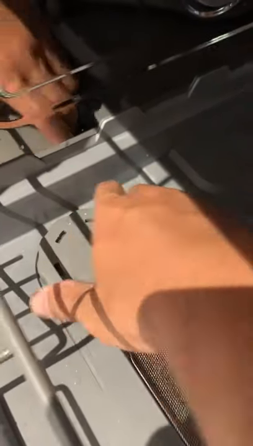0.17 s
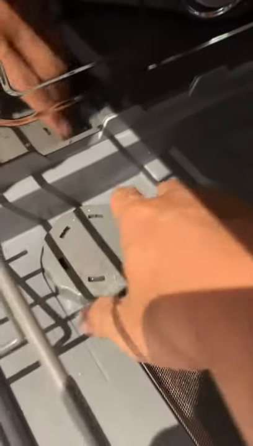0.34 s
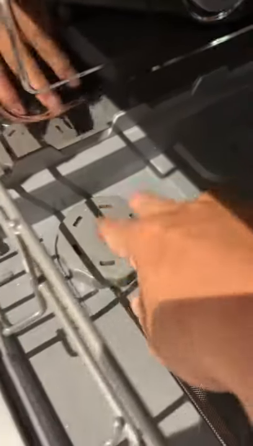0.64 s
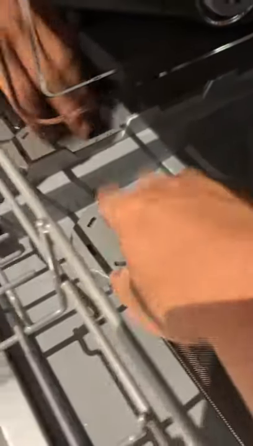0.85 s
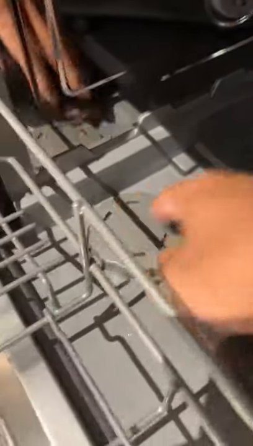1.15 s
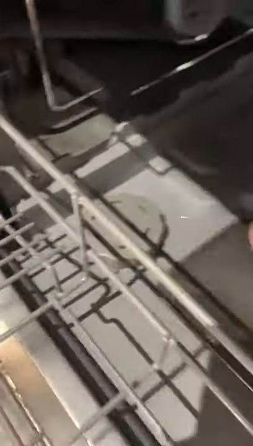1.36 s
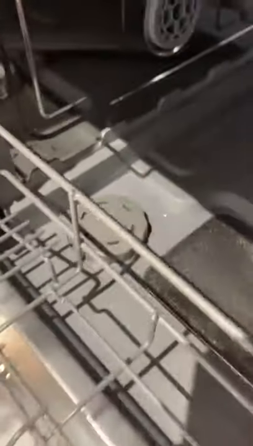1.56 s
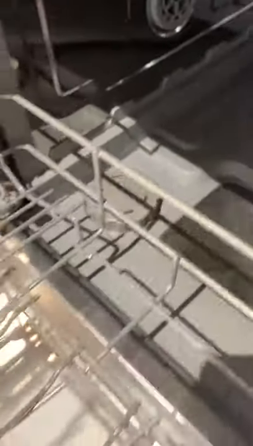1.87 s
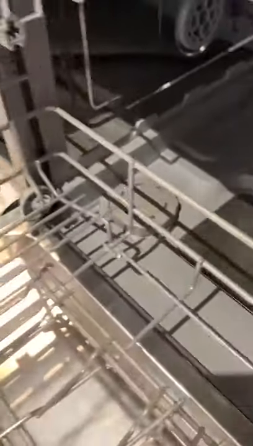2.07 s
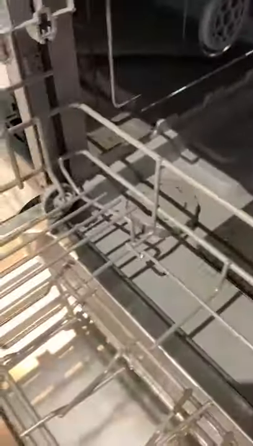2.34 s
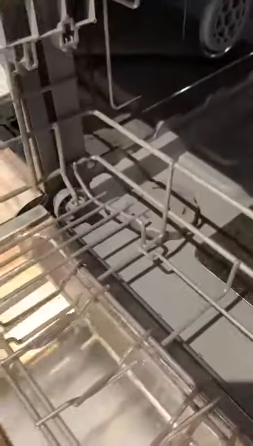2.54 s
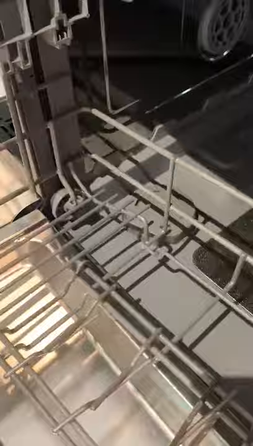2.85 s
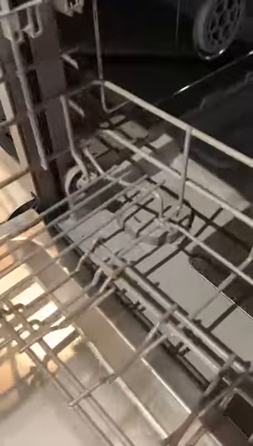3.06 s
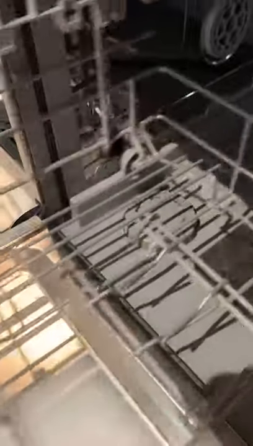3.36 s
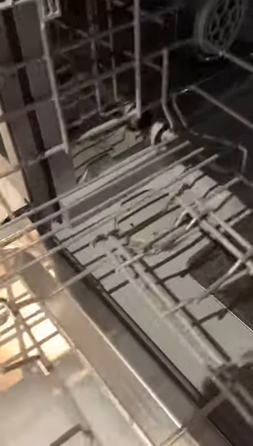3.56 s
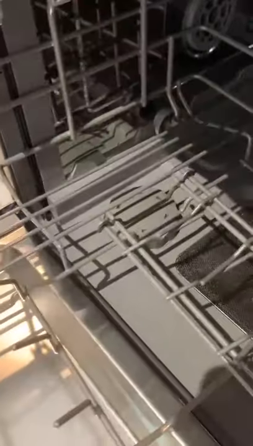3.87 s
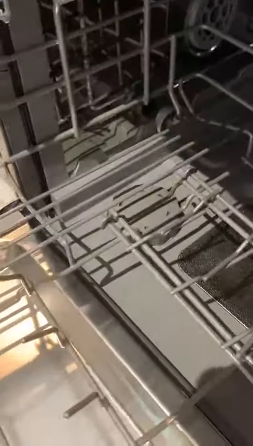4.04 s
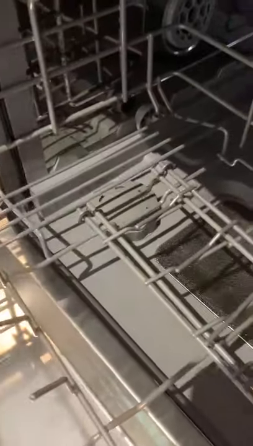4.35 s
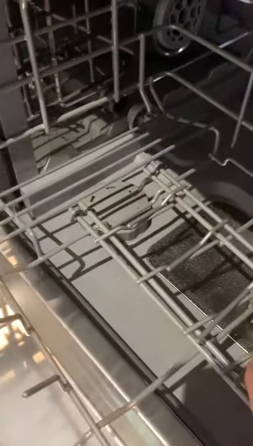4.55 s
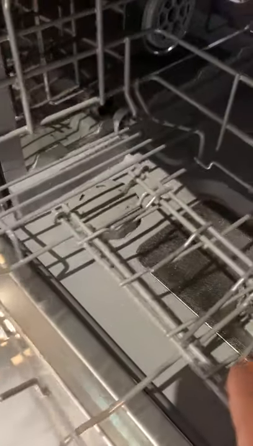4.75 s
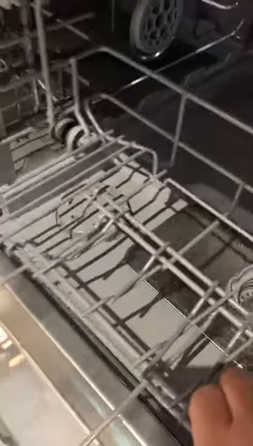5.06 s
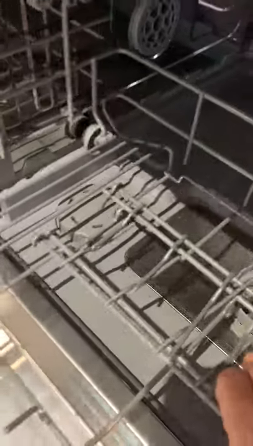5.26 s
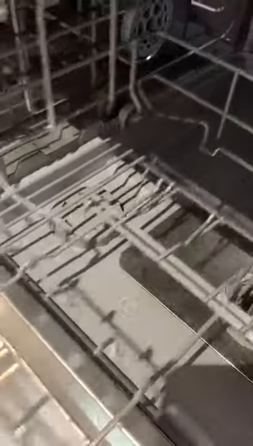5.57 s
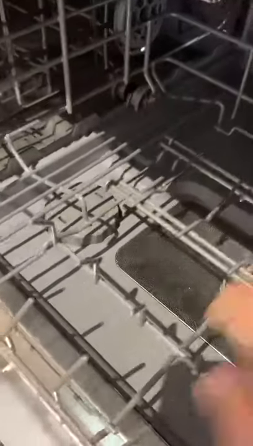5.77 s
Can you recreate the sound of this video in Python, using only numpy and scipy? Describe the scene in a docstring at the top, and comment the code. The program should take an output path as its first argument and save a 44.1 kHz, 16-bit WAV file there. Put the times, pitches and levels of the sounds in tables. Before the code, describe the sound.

Close, dry stereo in an open dishwasher in a quiet kitchen. A low motor hum runs throughout. Just before one second a plastic part snaps into the tub floor with a hard knock and a hollow boom. Then a coated wire rack is rolled in short shoves, clacking and rattling, with a dense clatter around three and a half seconds and a harder one near five.

```python
"""Rack and tub of a dishwasher

Close to an open dishwasher, a plastic part snaps into the tub floor: filtered noise bursts and a boom.
Then a coated wire rack is rolled and jostled: chattering pulses excite noise, with modes of wires and frame.
Landings make the hollow door and tub boom; random bumps and snags give the wheels' rumble and scrape.
Harmonics of a motor hum somewhere in the kitchen, over soft noise of the air."""
import sys
import numpy as np
from scipy import signal
from scipy.fft import rfft, irfft
from scipy.io import wavfile

SR = 44100
rng = np.random.default_rng(int(sys.argv[2]) if len(sys.argv) > 2 else 0)


def int16_out(signal):
    """Quantize to a 16-bit WAV file."""
    q = np.round(np.clip(np.atleast_2d(signal).T, -1, 1) * 32767)
    wavfile.write(sys.argv[1], SR, q.astype(np.int16))


N = 260631
NOW = np.arange(N) / SR
AGE = np.arange(SR // 2) / SR  # seconds since a blow
WIDE_HZ = 660  # above this the two channels differ fully
TUB_T60_S, TUB_DB = .28, -19  # the steel tub holds the sound briefly


def undb(db):
    """Logarithmic level: decibels to amplitude gain."""
    return 10 ** (np.asarray(db) / 20)


def fade(t60):
    """Exponential decay: a free vibration falls 60 dB in t60 seconds."""
    return np.exp(-np.log(1000) * AGE / t60)


def push(centre_hz):
    """Contact stiffness: a dull contact builds up more slowly than a bright one."""
    return 1 - np.exp(-2 * AGE * centre_hz)


def level(x, db, size=None):
    """Power scaling: set a blend of mid and channel power over the first size samples."""
    mid_power = np.mean(x.mean(0)[:size] ** 2)
    channel_power = np.mean(x[:, :size] ** 2)
    return x * undb(db) / np.sqrt(mid_power / 2 + channel_power / 4)


def add(out, s, sound):
    """Superposition: mix a sound into out from time s."""
    start = int(s * SR)
    out[:, start:start + sound.shape[1]] += sound[:, :N - start]


def walk(per_s):
    """Random modulation: a slow wander through per_s random points a second."""
    steps = rng.standard_normal(400)
    return np.interp(NOW * per_s, np.arange(len(steps)), steps)


def focus(hz, centre_hz, slope_db):
    """Contact filtering: gain falls by slope_db an octave on both sides of the favoured range."""
    return undb(-slope_db * np.abs(np.log2(hz / centre_hz)))


def apart(hz):
    """Spatial coherence: long waves reach both channels alike, short ones do not."""
    return np.minimum(hz / WIDE_HZ, 1) ** 1.25


def noise(size, colour, centre_hz=1000, slope_db=0, ripple_db=4.5, spacing_hz=90):
    """Resonance-coloured noise: stereo, rms 1, rippled by the many resonances of the tub."""
    hz = np.maximum(np.fft.rfftfreq(size, 1 / SR), 1)
    short_wave = apart(hz)
    points, db = np.transpose(colour)
    colour_db = np.interp(np.log(hz), np.log(points), db)
    ripple = np.interp(hz / spacing_hz, np.arange(400), rng.standard_normal(400))
    gain = undb(colour_db + ripple_db * ripple * short_wave) * focus(hz, centre_hz, slope_db)
    mid, side = rfft(rng.standard_normal((2, size)))
    x = irfft(gain * np.array([mid + short_wave * side, mid - short_wave * side]), size)
    return x / x.std()


def ring(modes, centre_hz, slope_db, scatter_db, detune):
    """Modal synthesis: decaying sines whose mix and channel lag vary with where the blow lands."""
    out = 0
    draws = rng.standard_normal((len(modes), 3))
    for (hz, db, t60), (size, shift, lag) in zip(modes, draws):
        turn = 2 * np.pi * hz * (1 + detune * shift) * AGE
        phase = turn + lag * apart(hz) * np.array([[1], [-1]])
        gain = undb(db + scatter_db * size) * focus(hz, centre_hz, slope_db)
        out = out + gain * fade(t60) * np.sin(phase)
    return out / np.sqrt(np.mean(out[:, :SR // 100] ** 2))


def excite(pulses, body):
    """Convolution: every pulse sets off the body's response."""
    return signal.fftconvolve(pulses[None], body, axes=1)[:, :len(pulses)]


MOTOR_HZ = 56.87  # mean shaft rate
KITCHEN_DB = -48  # air noise
# Harmonics of the motor. Each row: multiple of the shaft rate, rms level in dB before the drift in level.
MOTOR_HARMONICS = [(1, -45), (2, -53.5), (3, -48.5)]
# Level of the hum as the listening point moves. Each row: time in seconds, gain in dB.
HUM_DRIFT = [(.7, 3.5), (1.7, 0)]
# Colour of the air noise. Each row: frequency in Hz, relative density in dB per Hz.
AIR_COLOUR = [(30, -12), (65, 11), (140, 12), (220, -3.5), (2000, -11), (3200, -19), (5200, -23),
              (8200, -14.5), (9200, -19.5), (14000, -32)]


def kitchen(waver=0.12):
    """Harmonic series: a motor of slightly unsteady speed hums over soft air noise."""
    drift_s, drift_db = np.transpose(HUM_DRIFT)
    hum_gain = undb(np.interp(NOW, drift_s, drift_db))
    shaft = 2 * np.pi * MOTOR_HZ * NOW + waver * walk(2.31)
    hum = 0
    for multiple, db in MOTOR_HARMONICS:
        start_phase = 2 * np.pi * rng.random()
        hum = hum + np.sqrt(2) * undb(db) * np.sin(round(multiple) * shaft + start_phase)
    air = noise(N, AIR_COLOUR, ripple_db=2.2)
    return hum * hum_gain + air * undb(KITCHEN_DB)


# Modes of the hollow door and tub floor. Each row: frequency in Hz, relative level in dB, free t60 in seconds.
DOOR_MODES = [(61.6, 0, 0.16), (85, -0.5, 0.29), (117.2, 0.5, 0.16), (134.8, 1.5, 0.21), (167.4, -4, 0.39),
              (201.4, 1, 0.13)]


def boom(db, centre_hz):
    """Panel resonance: the hollow door and tub floor swell and boom."""
    swing = ring(DOOR_MODES, centre_hz, slope_db=15.0, scatter_db=2, detune=0.02) * (1 - fade(0.039))
    return level(swing, db - 1.5, size=1800)


# Modes of the rack's frame. Each row: frequency in Hz, relative level in dB, free t60 in seconds.
FRAME_MODES = [(247, 0, .24), (298, 0, .28), (322, 4, .16), (350, 3, .42), (428, -4, .2)]


def frame_ring(db):
    """Damped modes: the frame rings anew at every blow; the runners soon take up the first swing."""
    swing = ring(FRAME_MODES, 400, slope_db=6, scatter_db=2, detune=.025) * (1 - fade(.03))
    return level(swing * (fade(0.056) + 0.46), db, size=1100)


PART_S = .8555  # the plastic part snaps home
# Colour of the plastic part's crack. Each row: frequency in Hz, relative density in dB per Hz.
PLASTIC_COLOUR = [(150, -51), (330, 12.5), (600, 1.5), (780, 4.5), (1300, -11.5), (2150, 5.5), (3000, -5),
                  (5400, -8), (13000, -24.5)]
# The tub floor giving way under the part, pressed and then snapped in.
# Each row: start in seconds, boom level in dB before the 1.5 dB cut in boom(), boom centre in Hz.
FLOOR_PRESSES = [(0.73, -39, 57.6), (0.868, -22, 97), (0.92, -37, 77)]


def knock(db=-27.5, echo_db=-19, seat_s=.861, seat_db=-34, frame_db=-48):
    """Impact and resonance: a stiff part snaps in and seats; crack, echo, thud, floor boom and frame ring."""
    crack = noise(len(AGE), PLASTIC_COLOUR, ripple_db=2) * fade(.068)
    echo = noise(len(AGE), PLASTIC_COLOUR, centre_hz=550, slope_db=3) * fade(.36)
    thud = noise(len(AGE), PLASTIC_COLOUR, centre_hz=670, slope_db=9) * fade(0.073) * push(680)
    out = np.zeros((2, N))
    add(out, PART_S, level(crack + undb(echo_db) * echo, db, size=750))
    add(out, seat_s, level(thud, seat_db, size=750) + frame_ring(frame_db))
    for s, boom_db, centre_hz in FLOOR_PRESSES:
        add(out, s, boom(boom_db, centre_hz))
    return out


def chatter(chatter_ms, gap_ms=2.5, first=1.3, uneven_db=3, count=60):
    """Repeated impact: a first touch, then rebounds of uneven size and gap that weaken on the whole."""
    gaps = rng.exponential(.5, count)
    sizes = rng.standard_normal(count)
    sides = rng.choice([-1, 1], count)
    ms = np.cumsum(gap_ms * (.5 + gaps))
    pulses = np.zeros(len(AGE))
    pulses[0] = first
    at = np.minimum(ms * SR // 1000, len(AGE) - 1).astype(int)
    pulses[at] += sides * undb(uneven_db * sizes) * np.exp(-ms / chatter_ms)
    return pulses


WIRE_SHARE_DB, FRAME_SHARE_DB = -1, -10  # wire tones and frame ring against the clack
# Wires striking wires and runners. Each row: start in seconds, clack level in dB, clack centre in Hz,
# tick level in dB, chatter decay time in ms.
WIRE_CLACKS = [ (1.17, -66, 1970, -62, 2.8), (1.769, -55.5, 746, -59.5, 30), (2.385, -48, 2420, -56, 26),
               (2.488, -35.5, 1260, -52, 5.1), (2.498, -40, 1070, -45, 6.8),
               (2.507, -40.5, 1720, -43.5, 14), (2.523, -50, 1900, -40.5, 9), (2.547, -40, 1670, -54, 18),
               (2.565, -48, 710, -43, 8), (2.821, -42, 740, -55.5, 9.4), (2.924, -69, 1700, -53, 1.9),
               (3.005, -46, 660, -61, 12), (3.211, -47, 1190, -50, 27), (3.278, -45, 3100, -55.5, 6),
               (3.353, -33.5, 1340, -42.5, 4.8), (3.362, -29.5, 1860, -39.5, 11.6),
               (3.379, -39, 1650, -46.5, 26), (3.452, -34, 2020, -41.5, 5.1),
               (3.463, -33.5, 610, -41.5, 16), (3.555, -39, 2150, -45.5, 1.4),
               (3.6029, -42.5, 2960, -51, 2.5), (3.605, -29.5, 1150, -61, 1.3),
               (3.628, -41.5, 1150, -65, 10), (3.662, -48, 2900, -49, 4), (3.689, -34.5, 887, -46.5, 14),
               (3.71, -38, 1000, -56, 7.6), (3.842, -39, 670, -78, 2.7), (3.972, -52, 1040, -85, 3.3),
               (4.209, -41, 1200, -54.5, 15), (4.243, -41.5, 1080, -58, 4), (4.412, -41, 1290, -48.5, 17),
               (4.778, -37.5, 960, -49, 2.3), (4.811, -32, 1180, -50, 6.4), (4.82, -30.5, 1410, -47, 3.7),
               (4.827, -29, 554, -60, 1.1), (4.872, -43.5, 1900, -47, 26), (4.931, -41.5, 1500, -48, 8.7),
               (4.9442, -24.5, 1510, -34.5, 15), (4.981, -31.5, 680, -38.5, 33),
               (5.0063, -25, 1110, -41.5, 1.5), (5.015, -37.5, 1720, -36, 19.5),
               (5.124, -32.5, 1800, -43, 11), (5.151, -38.5, 1090, -48, 5), (5.181, -39, 800, -39, 18),
               (5.232, -46.5, 1690, -53, 7.9)]
# Modes of the wires. Each row: frequency in Hz, relative level in dB, free t60 in seconds.
WIRE_MODES = [(587, 7, .13), (665, 5, .1), (845, 1, .09), (1090, 4, .15), (1250, 3, .14), (1400, -1, .1),
              (1590, 2, .12), (1680, 1, .11), (1812, 2, .15), (2015, 1, .15), (2355, -3, .12),
              (3180, -10, .08)]
# Colours of the dry crack and the bright tick. Each row: frequency in Hz, relative density in dB per Hz.
CRACK_COLOUR = [(200, -49), (450, 15), (700, 11), (1100, 4), (2100, 3), (3000, -6), (5000, -4),
                (13000, -40)]
TICK_COLOUR = [(1000, -11), (2400, 13), (4500, 15), (9500, 14), (14000, 6)]


def rack():
    """Impact excitation: each chattering contact cracks, ticks, and sounds the wires and the frame."""
    out = np.zeros((2, N))
    echo = undb(TUB_DB) * fade(TUB_T60_S)
    for s, clack_db, centre_hz, tick_db, chatter_ms in WIRE_CLACKS:
        pulses = chatter(chatter_ms)
        crack = noise(len(AGE), CRACK_COLOUR, centre_hz, slope_db=11, ripple_db=2)
        crack = crack * (fade(.022) + echo) * push(centre_hz)
        swell = 1 - np.exp(-AGE * 2000 / chatter_ms)  # longer chatter builds up the wires more slowly
        wires = ring(WIRE_MODES, centre_hz, slope_db=14, scatter_db=2, detune=.004) * swell
        tick = noise(len(AGE), TICK_COLOUR, ripple_db=3) * (fade(.021) + undb(-3) * echo)
        add(out, s, level(excite(pulses, crack), clack_db, size=900))
        add(out, s, level(wires, clack_db + WIRE_SHARE_DB, size=900))
        add(out, s, level(excite(pulses, tick), tick_db, size=600))
        add(out, s, frame_ring(clack_db + FRAME_SHARE_DB))
    return out


# The rack's weight landing on its wheels. Each row: start in seconds,
# door boom level in dB before the 1.5 dB cut in boom(), boom centre in Hz, frame ring level in dB.
RACK_LANDINGS = [ (1.774, -47, 108, -50), (2.408, -59, 144, -34), (2.58, -23.5, 146, -43),
                 (2.825, -36, 151, -36), (3.021, -32, 133, -44.5), (3.236, -31.5, 70.7, -44.5),
                 (3.28, -50, 130, -36), (3.46, -26.5, 177, -26), (3.606, -30.5, 131, -22.5),
                 (3.708, -21.5, 96.5, -30.5), (3.842, -30, 144, -31), (4.224, -22, 79.5, -39),
                 (4.281, -26.5, 78, -35.5), (4.435, -33, 135.6, -41), (4.681, -30.5, 83.5, -41),
                 (4.785, -30, 79, -38), (4.85, -21, 114, -56), (4.98, -24, 101, -25.5),
                 (5.155, -21, 124, -30), (5.253, -27.5, 126, -40)]


def jolts():
    """Structure-borne impact: each landing of the rack shakes its frame and the door beneath it."""
    out = np.zeros((2, N))
    for s, boom_db, centre_hz, frame_db in RACK_LANDINGS:
        add(out, s, boom(boom_db, centre_hz) + frame_ring(frame_db))
    return out


SPEED_UP_POWER, COAST_S = 0.82, 0.13  # power of time while shoved, decay time of the coasting


def speed(start, length):
    """Drive and friction: the rack gathers pace while shoved, then coasts to rest (share of top speed)."""
    age = np.maximum(NOW - start, 0)
    gather = np.minimum(age / length, 1) ** SPEED_UP_POWER
    return gather * np.exp(-np.maximum(age - length, 0) / COAST_S)


# Shoves of the rack along its runners. Each row: start in seconds, length in seconds,
# rumble gain in dB at top speed before the cut in wheels(), scrape gain in dB at top speed.
RACK_SHOVES = [(2.012, 0.049, -40.5, -62), (2.337, 0.18, -28, -39.5), (2.771, 0.16, -35.5, -51),
               (3.178, 0.36, -30, -40), (3.609, 0.051, -23, -43), (4.09, 0.18, -34.5, -52),
               (4.703, 0.43, -25.5, -36.5), (5.339, 0.22, -37.5, -40.5)]


def rolling():
    """Speed-dependent excitation: gains of the rumble and the scrape follow the speed of the rack."""
    rumble = sum(undb(db) * speed(start, length) for start, length, db, _ in RACK_SHOVES)
    scrape = sum(undb(db) * speed(start, length) for start, length, _, db in RACK_SHOVES)
    return rumble, scrape


def knocks(per_s, spread_db):
    """Poisson-like impacts: pulses at random moments, most of them weak and a few hard."""
    hits = rng.random(N) < per_s / SR
    sizes = undb(spread_db * np.minimum(rng.exponential(1, N), 3))
    return hits * sizes * rng.choice([-1, 1], N)


BUMPS_PER_S, SNAGS_PER_S, SNAG_SPREAD_DB = 1800, 260, 3.2
SNAG_DB, SNAG_WIRES_DB = -2, -19  # snags against bumps, wire tones against each snag's noise before push
# Colour of wheels on runners. Each row: frequency in Hz, relative density in dB per Hz.
SCRAPE_COLOUR = [(200, 1), (400, -1), (600, 9), (900, 4.5), (1400, 2.5), (2100, -3.5), (3000, -12),
                 (5000, -18.5), (9000, -16), (14000, -19)]


def wheels(frame_db=-7, loaded_t60=0.058):
    """Rolling contact: plastic wheels rumble and scrape over tiny bumps; spurts of snags stir the wires."""
    rumble, scrape = rolling()
    bumps = knocks(BUMPS_PER_S, 2) * undb(1.7 * walk(30))
    snags = knocks(SNAGS_PER_S, SNAG_SPREAD_DB) * undb(2 * walk(30))
    echo = undb(TUB_DB) * fade(TUB_T60_S)
    grain = noise(len(AGE), SCRAPE_COLOUR, ripple_db=1) * (fade(.02) + echo)
    catch = noise(len(AGE), SCRAPE_COLOUR, 1100, slope_db=3, ripple_db=2)
    catch = catch * (fade(.025) + echo) * push(700)
    wires = ring(WIRE_MODES, 700, slope_db=6, scatter_db=1, detune=.003) * push(700)
    snag = catch + undb(SNAG_WIRES_DB) * wires
    friction = level(excite(bumps, grain), 0) + level(excite(snags, snag), SNAG_DB)

    loaded = fade(loaded_t60) * (1 - fade(0.11))  # the pressing wheels damp the modes

    def rolled(modes):
        """Forced vibration: the bumps drive damped modes."""
        body = ring(modes, 216, slope_db=2.0, scatter_db=-1.5, detune=0.0074) * loaded
        return level(excite(bumps, body), 0)

    door = rolled(DOOR_MODES)
    frame = rolled(FRAME_MODES)
    return level(friction, 0) * scrape + (door + undb(frame_db) * frame) * rumble * undb(-2.0)


def scene():
    """Superposition: kitchen, knock, rack, landings and wheels together."""
    return kitchen() + knock() + rack() + jolts() + wheels()


def record(dry):
    """Band limiting: the deepest bass and the top are cut."""
    lean = signal.sosfilt(signal.butter(4, 40, "highpass", fs=SR, output="sos"), dry)
    return signal.sosfilt(signal.ellip(8, .2, 70, 14700, fs=SR, output="sos"), lean)


dry = scene()
out = record(dry)
int16_out(out)
```